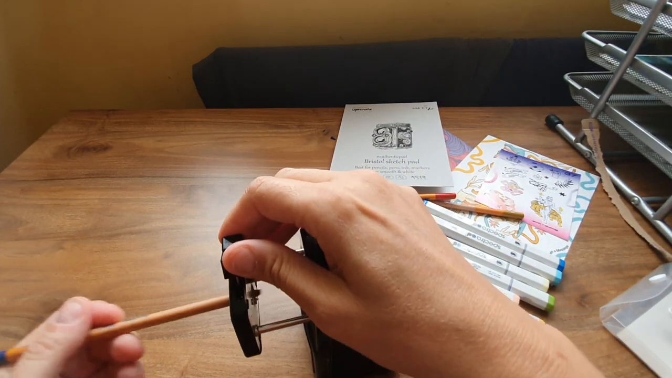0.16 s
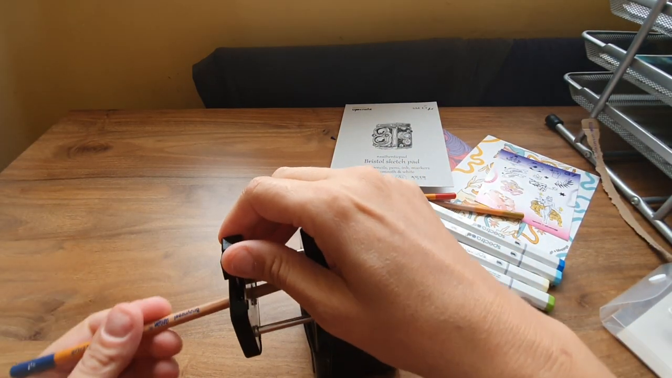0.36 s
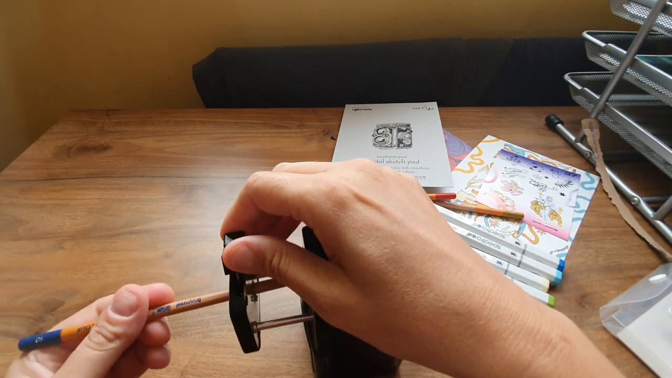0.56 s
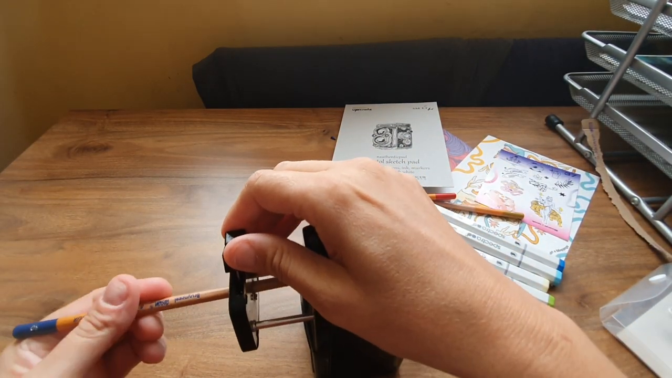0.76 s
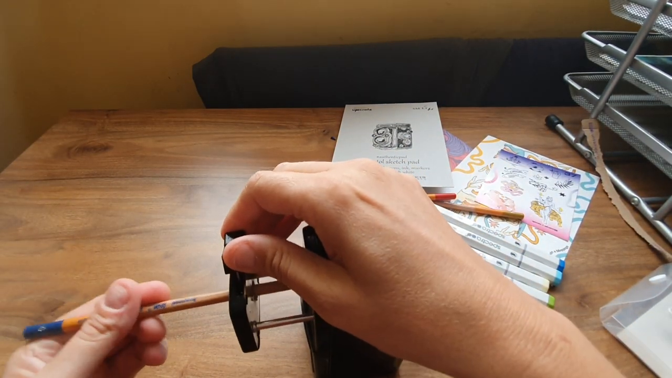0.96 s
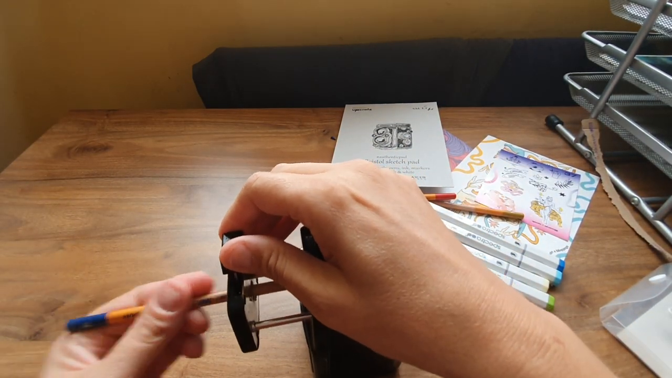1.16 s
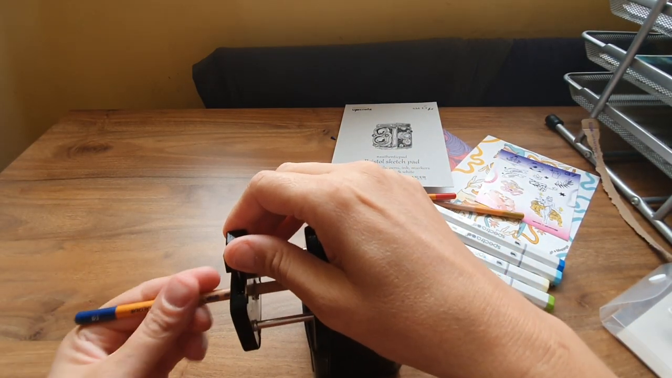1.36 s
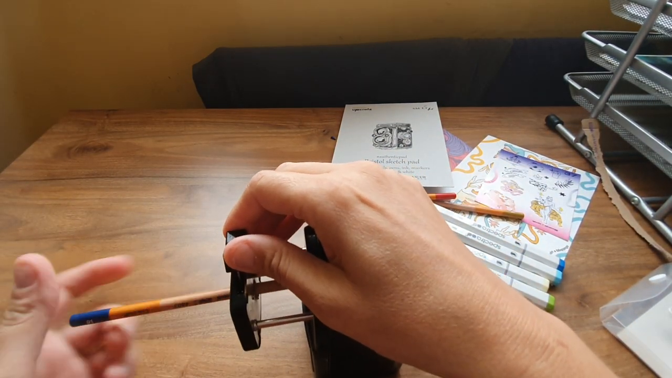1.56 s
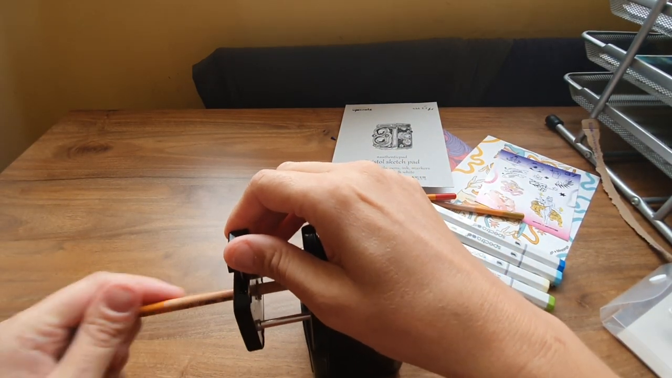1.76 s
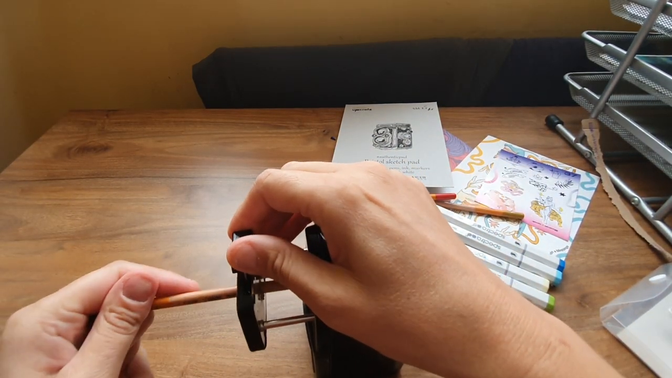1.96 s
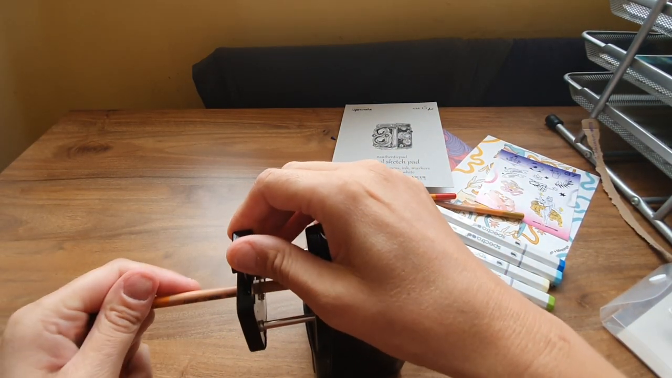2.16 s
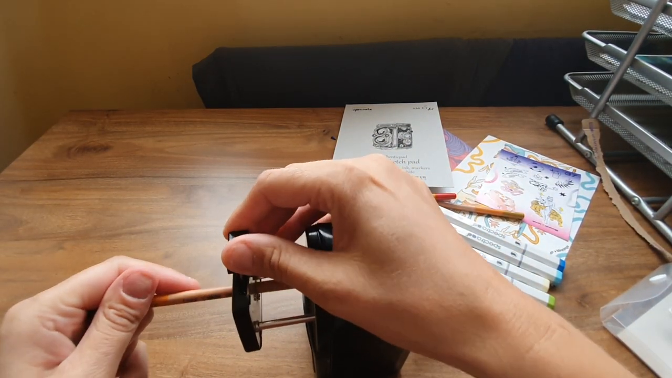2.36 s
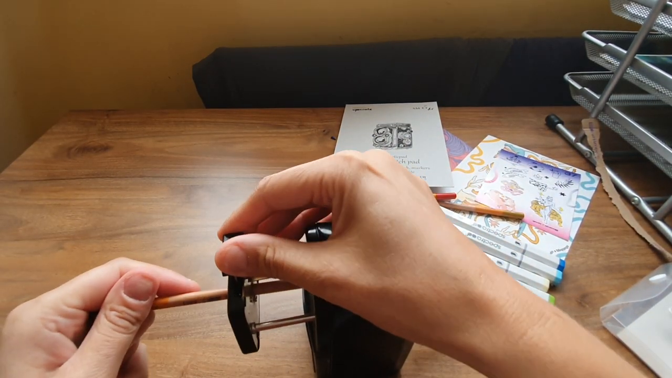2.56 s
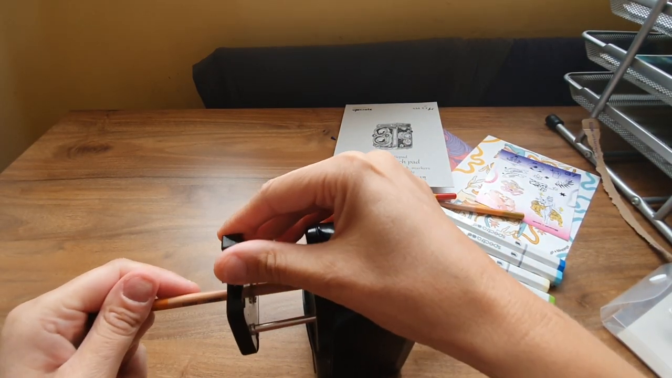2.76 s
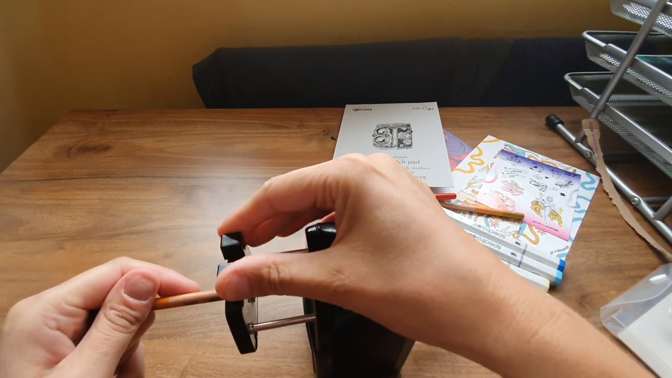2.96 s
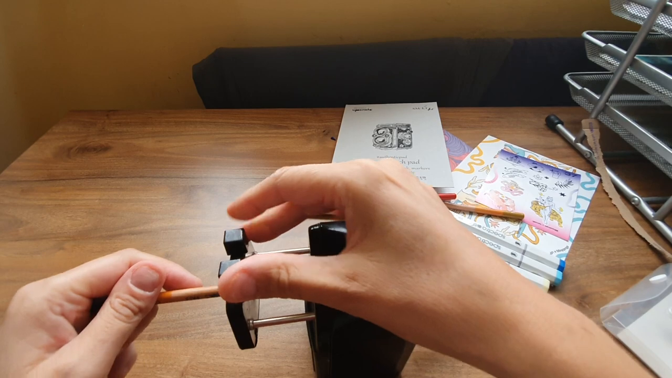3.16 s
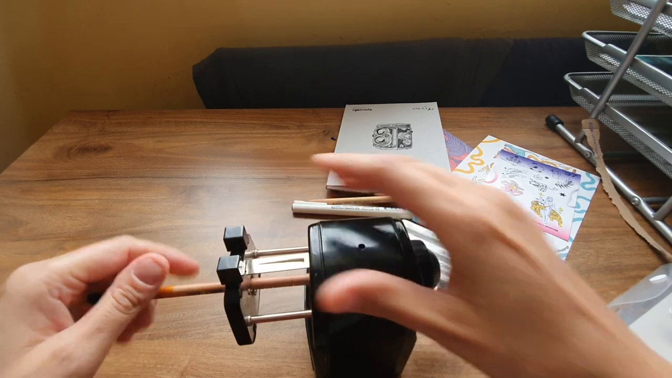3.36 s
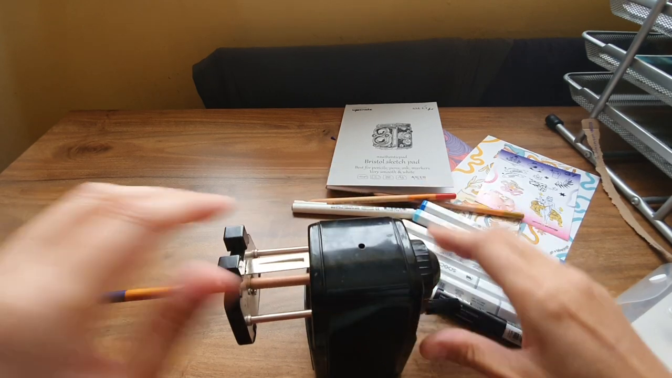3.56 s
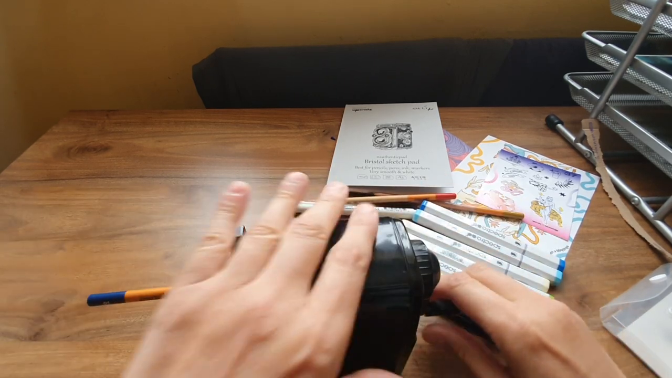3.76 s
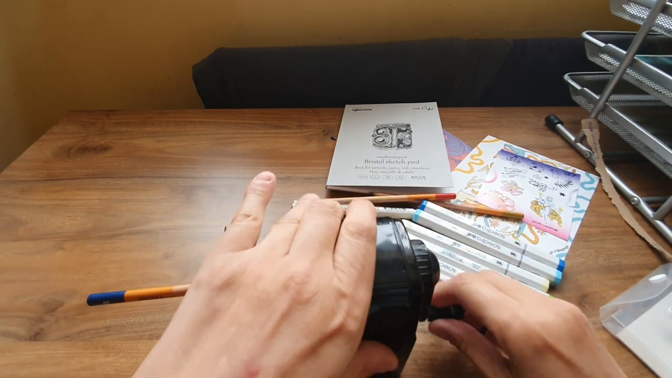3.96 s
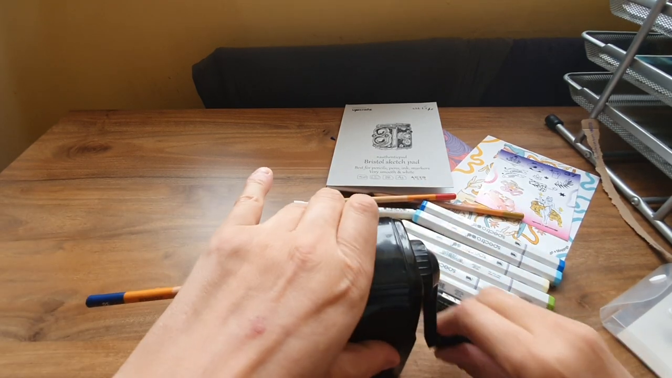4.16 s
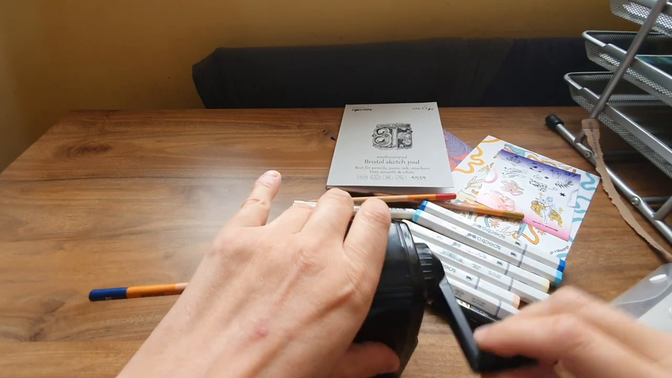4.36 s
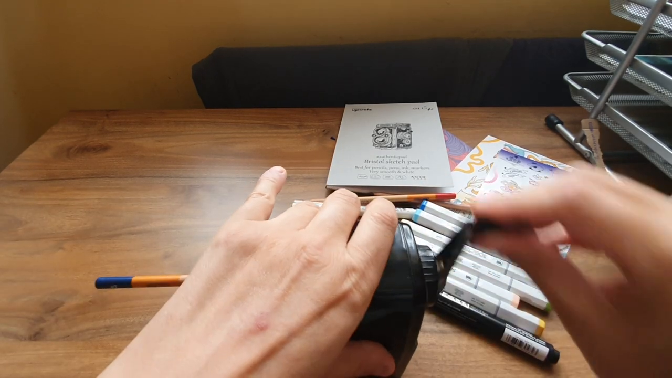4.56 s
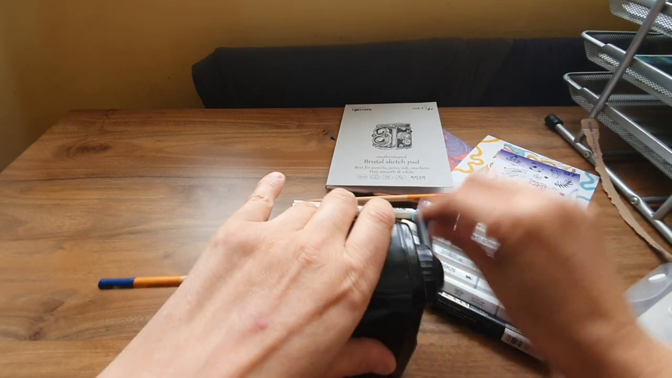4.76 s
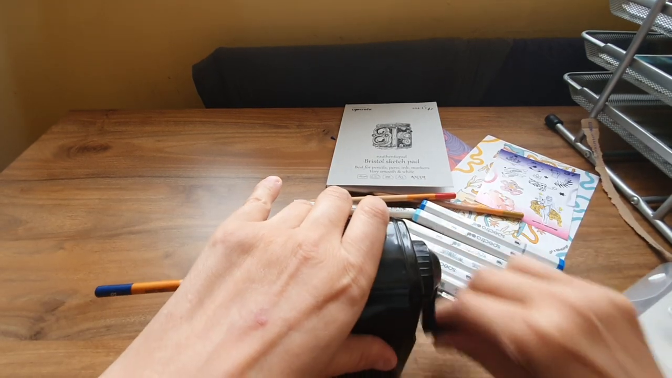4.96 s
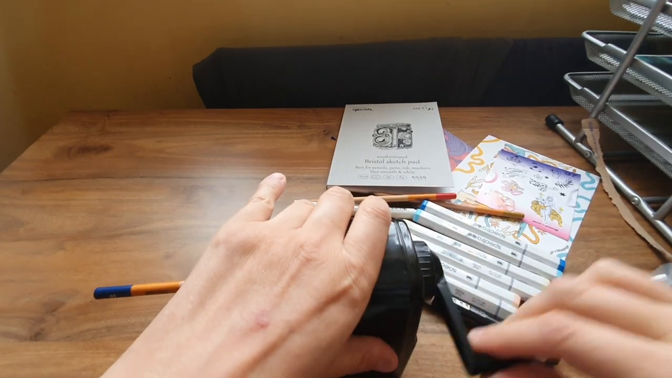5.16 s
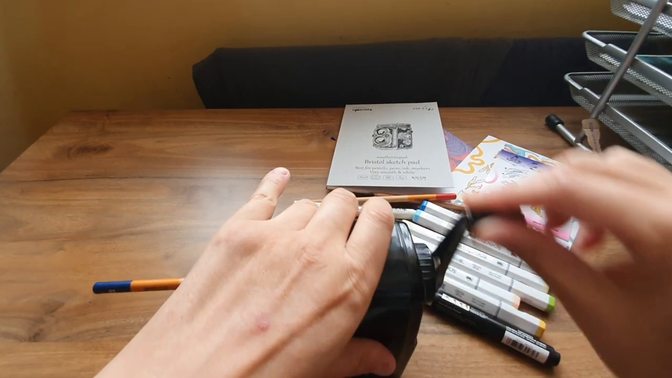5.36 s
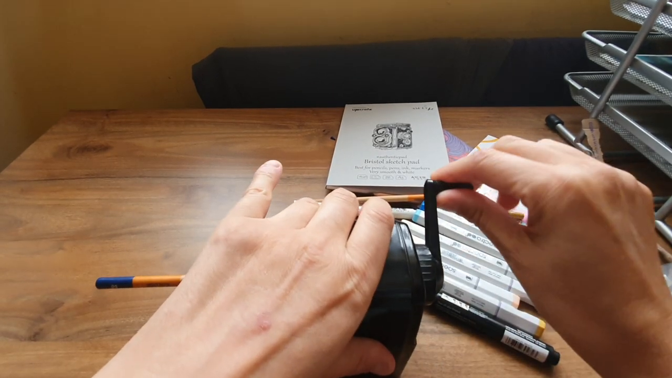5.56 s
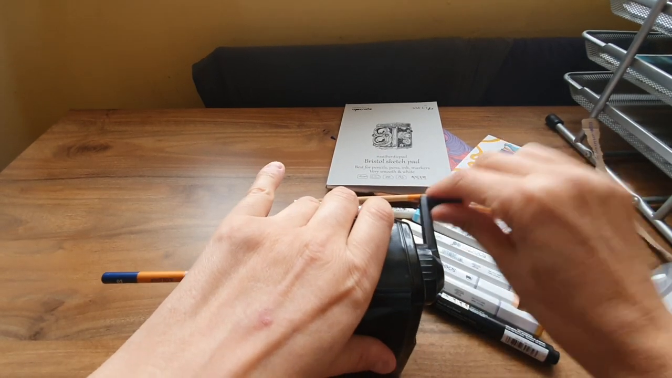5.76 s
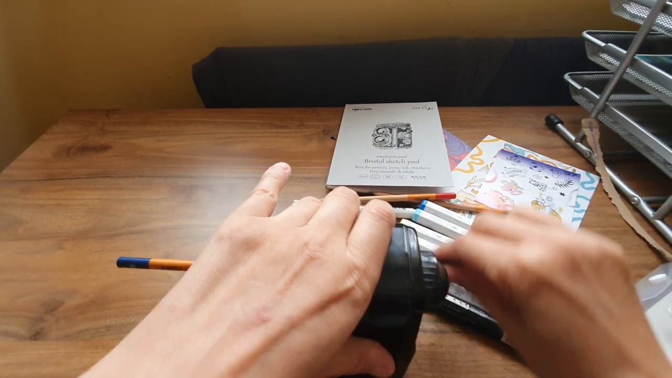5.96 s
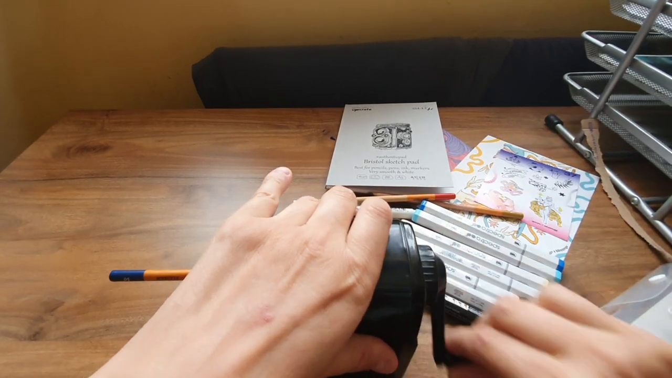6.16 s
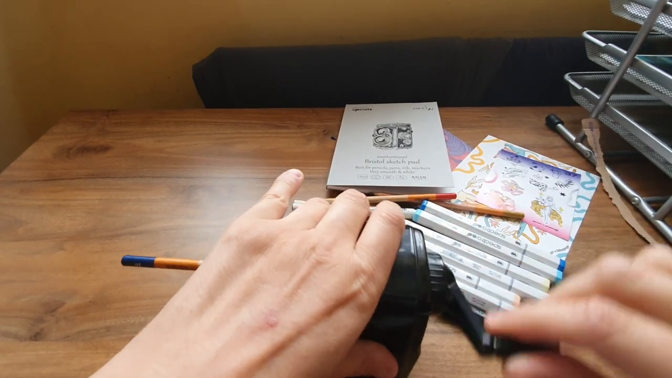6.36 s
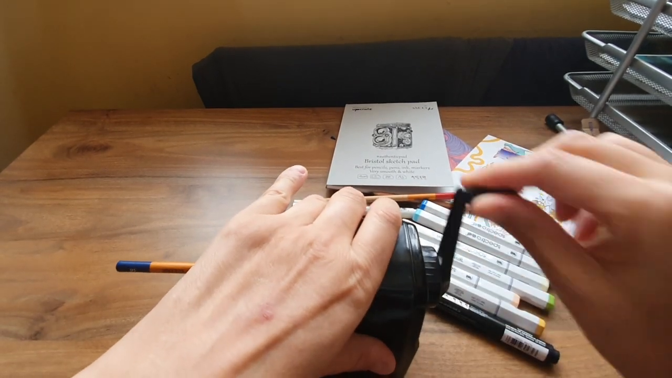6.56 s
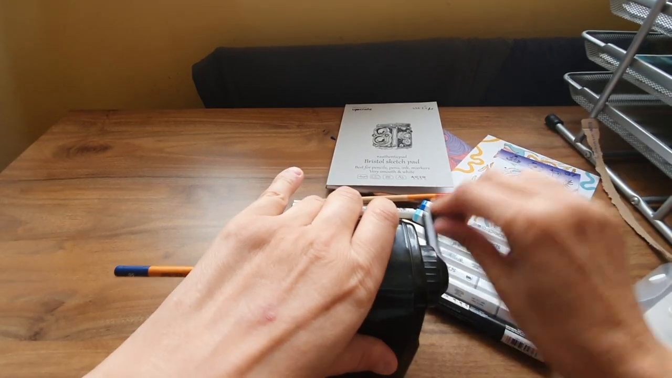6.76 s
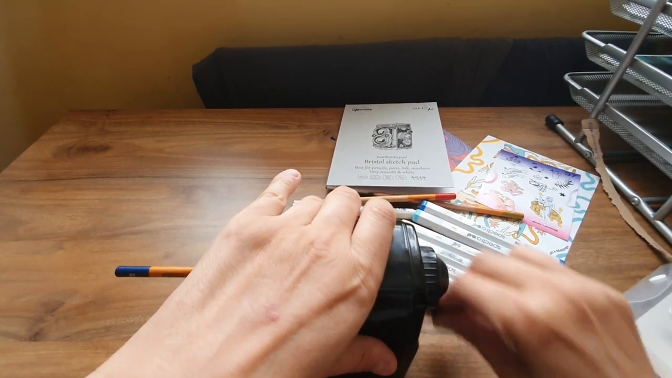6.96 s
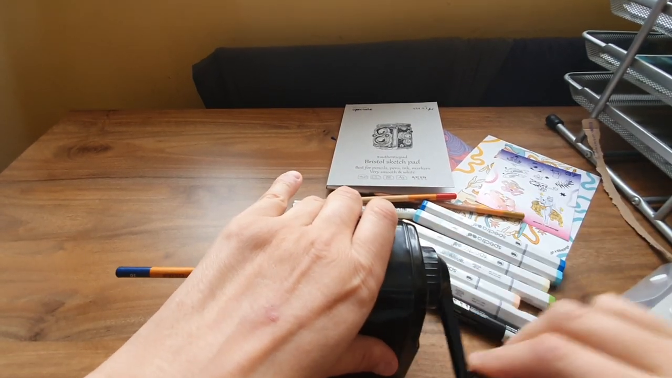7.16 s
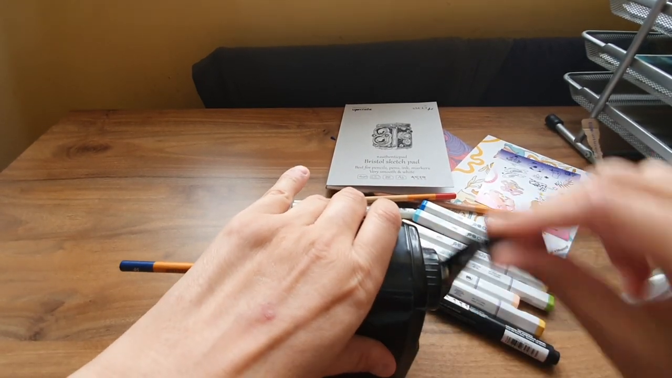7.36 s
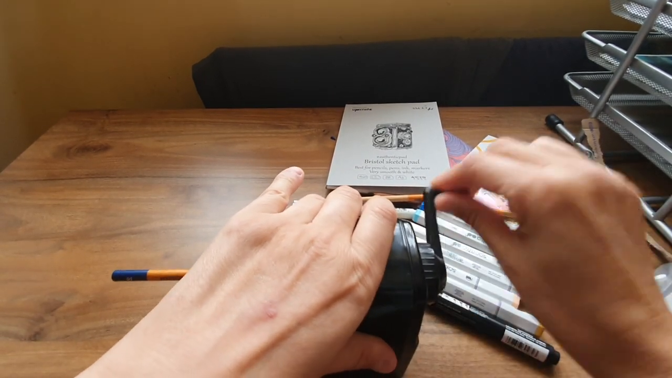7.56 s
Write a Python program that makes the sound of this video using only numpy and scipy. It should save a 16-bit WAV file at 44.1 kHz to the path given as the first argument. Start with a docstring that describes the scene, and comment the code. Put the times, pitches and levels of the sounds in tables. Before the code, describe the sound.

A pencil clicks and scrapes into a hand-crank sharpener, sharp clamp snaps follow, then uneven woody grinding starts on a wooden desk indoors.

```python
"""Small furnished room, wooden desk, close pair of microphones: a pencil enters a hand-crank sharpener.
Fine grains ring the pencil in the clamp; noise bursts through resonances make taps and clamp snaps.
Then the crank turns: dense uneven chip grains, paced by the flutes, shake plastic housing and desk and hiss.
A steel spring, a set of high decaying modes, rings when jolted. Room tone lies under it all."""
import sys
import numpy as np
from scipy import signal
from scipy.fft import rfft, irfft, next_fast_len
from scipy.io import wavfile

SR = 44100
rng = np.random.default_rng(int(sys.argv[2]) if len(sys.argv) > 2 else 0)


def unload_wav(signal):
    """Save mono or channel-first audio to the path in sys.argv[1] as 16-bit WAV at rate SR, clipped to [-1, 1]."""
    wavfile.write(
        sys.argv[1],
        SR,
        np.round(np.clip(np.atleast_2d(signal).T, -1, 1) * 32767).astype(np.int16),
    )


N = 335160
FFT_SIZE, PAD = 2 ** 15, next_fast_len(N + 8192)   # samples

# Levels in tables are relative drives unless a reference is given.
# room tone spectrum: f/Hz, density/dB
ROOM_TONE_SPECTRUM = [(12, -47.5), (20, -2), (63, 3), (107, -11), (210, -11), (410, -25.5), (825, -28),
                      (1440, -33), (2260, -31.5), (4670, -36), (7520, -41), (13200, -41), (16000, -48.5)]
# walls: f/Hz, level re direct/dB
WALL_GAIN = [(60, -19.5), (250, -12), (600, -3.5), (2000, -7), (6000, -2.5), (14000, -9)]
# near reflections: f/Hz, level re direct/dB
NEAR_GAIN = [(200, -30), (1000, -14), (3000, -11), (15000, -18)]
# balance of the pair: f/Hz, left minus right/dB
LEFT_MINUS_RIGHT = [(60, 5), (130, 0.5), (290, 0.5), (640, 1.5), (1410, 7), (3100, 3.5), (6820, 5.5),
                    (15000, 2.5)]
# desk resonances: f/Hz, width/Hz, level/dB
DESK_MODES = [(118.7, 14, 4.5), (163.4, 15.4, 6.5), (259.6, 24, 4), (357.2, 27, -1.5), (433, 34.4, -9.5)]
# smooth desk response: f/Hz, density/dB
DESK_BED_SPECTRUM = [(25, -12.5), (70, -9), (200, -9), (430, -15), (520, -31), (900, -73.5)]
# housing panel resonances: f/Hz, width/Hz, level/dB
HOUSING_MODES = [(687, 49, -4), (752, 14, -5.5), (833, 28, -5), (949, 41, -6.5), (1191, 58, -3.5),
                 (1281, 61, -7.5), (1423, 77, -4.5), (1575, 75, -1.5), (1660, 68, -9.5), (1928, 210, -3),
                 (2238, 69, -3.5), (2516, 86, 0), (2828, 160, -10), (3112, 92, -4), (3473, 530, -7)]
# smooth housing response: f/Hz, density/dB
HOUSING_BED_SPECTRUM = [(300, -40.5), (520, -20), (640, -8), (1500, -20.5), (2700, -12), (3600, -31.5),
                        (6000, -39.5)]
# pencil shaft resonances: f/Hz, width/Hz, level/dB
PENCIL_MODES = [(700, 200, -14), (1540, 150, -3), (1750, 180, -2), (2200, 300, -11), (2650, 340, 2),
                (3780, 300, -4), (4830, 280, -4), (5720, 280, -12), (7040, 300, -23), (9140, 500, -24),
                (10200, 600, -25), (12100, 400, -27)]
# smooth pencil response: f/Hz, density/dB
PENCIL_BED_SPECTRUM = [(300, -65), (1000, -14), (3000, -4.5), (6000, -20), (8000, -22.5), (16000, -30)]
# skin on plastic: f/Hz, density/dB
SKIN_SPECTRUM = [(300, -31), (750, 2.5), (1100, -9), (1800, 12), (2500, 4), (4800, -9), (7000, -10.5),
                 (11000, -18), (15000, -25)]
# crack of a contact: f/Hz, density/dB
CRACK_SPECTRUM = [(2200, -29), (3500, 9), (5500, 0.5), (7500, -2.5), (9100, 1), (11500, -6.5), (14000, -2),
                  (16000, -23.5)]
# shaving hiss: f/Hz, density/dB
HISS_SPECTRUM = [(2200, -19), (3500, 6.5), (4500, 3.5), (5500, 2.5), (7500, -7), (9100, 0.5), (10600, -8.5),
                 (12500, -4), (14000, -6.5), (15500, -3.5), (16500, -41)]
# edges of the hiss bands that flicker separately: f/Hz
HISS_EDGES_HZ = [2000, 3800, 5000, 6300, 7600, 9000, 10500, 12200, 14000, 18000]
# steel spring modes: f/Hz, level/dB, t60/s
SPRING_MODES = [(11400, -3, .09), (11480, -6, .07), (11250, -8, .03), (14030, -12, .05), (9330, -18, .05)]

# dull low thumps of the desk, from hands and from the first cutter catches: t/s, level/dB
DESK_THUMPS = [(0.389, -53.5), (0.552, -42), (0.61, -59), (1.559, -47), (1.618, -42), (1.947, -47),
               (2.503, -49.5), (3.35, -53.5), (4.351, -25), (4.383, -31.5)]
# lacquer squeak in the clamp: t/s, f/Hz, level/dB
SQUEAK_GLIDE = [(.33, 1520, -56), (.338, 1707, -40), (.35, 1790, -37), (.365, 1714, -54), (.385, 1490, -60)]
# fingertip on the hollow shavings drawer: touch t/s, lift t/s, attack/s, touch level/dB, lift level/dB
DRAWER_RUBS = [(2.922, 2.934, .004, -73, -67), (3.192, 3.31, 0.0054, -68, -78),
               (3.372, 3.405, .01, -72.5, -80), (3.797, 3.809, .003, -58, -55)]
# fingers shifting on the housing: touch t/s, lift t/s, attack/s, touch level/dB, lift level/dB
FINGER_STROKES = [(2.376, 2.528, 0.036, -63, -59.5), (2.8, 2.93, 0.0085, -70.5, -72),
                  (3.1, 3.18, 0.0096, -69, -76.5), (3.188, 3.4, 0.012, -70.5, -92.5),
                  (3.584, 3.65, 0.013, -79.5, -99), (3.97, 4.16, 0.033, -74.5, -88)]
# pencil sliding in the clamp, and ringing on after taps:
# start t/s, end t/s, attack/s, start level/dB, end level/dB
PENCIL_STROKES = [(0.014, 0.1, 0.005, -58.5, -121), (0.15, 0.33, 0.008, -53.5, -46),
                  (0.34, 0.464, 0.014, -44.5, -56), (0.879, 0.97, 0.002, -43.5, -71),
                  (0.982, 1.22, 0.022, -59, -36.5), (1.226, 1.27, .004, -34, -31),
                  (1.486, 1.554, 0.036, -49.5, -91), (1.59, 1.72, 0.004, -42.5, -78)]
# pencil and fingers tap clamp and housing:
# t/s, level/dB, ring f/Hz, crack/dB, desk thump/dB, contact/s, pan/dB; crack and thump ride on level
TAP_ROWS = [(0.198, -50, 980, -30, -15.5, 0.038, -3), (0.476, -25.5, 2630, -7, -17.5, 0.0059, 11.5),
            (0.498, -37, 1510, -27, -12, 0.014, -13), (0.544, -36.5, 750, -14, -9, 0.0072, -2),
            (0.878, -25, 1840, -2, -18.5, 0.0022, 15.5), (0.88, -30, 5300, -32, -40, 0.0017, -8),
            (0.897, -34.5, 1810, -29, -4.5, 0.017, -3), (1.223, -25, 1550, -21, -11, 0.0062, 12),
            (1.268, -26.5, 800, -40, -25.5, .012, -2.5), (1.264, -20, 1850, -7.5, -40, 0.0065, -9),
            (1.271, -17.5, 1620, -31, -10, 0.0042, 16), (1.473, -61, 4450, -29, -9, 0.012, 16),
            (1.56, -47, 1590, -28, -18, 0.0077, 0), (1.586, -31, 1640, -8, -27, 0.0056, 5.5),
            (2.078, -57, 1607, -24, -8.5, 0.013, 5.5), (2.619, -36.5, 760, -2, -13.5, 0.0041, 6),
            (2.947, -47, 1150, -20, -2, 0.016, -7), (3.188, -57, 720, -3, -8, 0.012, 12.5),
            (0.468, -45, 1000, -24, -5, .004, -4), (3.806, -46, 2810, -18, -14.5, 0.0071, 11),
            (3.819, -32, 1770, -21, -12, 0.028, -10), (4.087, -64, 3050, -11.5, -8, 0.0073, 5),
            (4.102, -59.5, 3100, -29, -32, .008, 6.5), (4.118, -56.5, 1220, -10, -7.5, .012, 10.5)]
# steel clamp and crank snap, tick and chatter:
# t/s, level/dB, ring f/Hz, crack/dB, bright tick/dB, desk thump/dB; the last three ride on level
SNAP_ROWS = [(0.846, -52.5, 1760, -1, 7.5, -16), (1.761, -47.5, 1380, -2, -27, 7),
             (1.769, -24.5, 1950, -5, -14, -19.5), (1.777, -22, 1810, 2, -11, -36),
             (1.783, -16.5, 2490, -29, -3, -14), (1.798, -19.5, 2700, -3, -7, -12.5),
             (1.847, -11, 1810, -2, -11, -23.5), (1.89, -37.5, 2213, -16.5, -15, -5),
             (2.5349, -23, 1670, -10.5, 5, -14.5), (2.549, -25.5, 2900, -16, -5, -33),
             (2.562, -41.5, 2240, 3, 14, -1), (2.8, -56, 4600, 1.5, -1, -22.5),
             (2.838, -56, 4600, -14, -2, -29), (2.938, -31, 1990, -34, -32, -13.5),
             (3.039, -64, 5460, 2, -4, -19), (3.05, -57, 1930, -5, 3, -15),
             (3.061, -37.5, 1900, -12, -0.5, -7.5), (3.104, -51.5, 1700, -7, -4, -3),
             (3.278, -58.5, 4760, -9, -10, -12), (3.582, -59.5, 3020, -10, -10, -17),
             (3.812, -22, 1440, -26, -10, -14.5), (3.8115, -23.5, 2740, -26, -25, -27)]
# jolts of the spring: t/s, level/dB
SPRING_JOLTS = [(1.777, -20), (1.8182, -38), (1.974, -56), (2.537, -36), (2.552, -27), (2.569, -40),
                (3.061, -64), (4.461, -31.5), (4.595, -30), (4.627, -33), (4.6828, -44), (5.279, -33.5),
                (5.3732, -37), (5.42, -46), (6.4336, -40), (7.3487, -39), (7.4497, -38)]
# cutter catches on the wood: t/s, level/dB, ring f/Hz, crack/dB; crack rides on level
CATCH_ROWS = [(4.177, -33.5, 660, -3.5), (4.232, -44, 816, -27), (4.243, -47, 3100, 4),
              (4.359, -21, 3070, -2.5), (4.391, -15.5, 1480, -16), (4.421, -23.5, 1590, -18),
              (4.464, -20.5, 1640, -24), (4.59, -17, 1440, -6), (4.845, -13, 895, -7.5),
              (5.277, -22, 1510, -2), (5.418, -13, 1600, -7.5), (5.613, -26.5, 1180, -31),
              (5.79, -42.5, 1500, -15), (6.07, -18, 910, -6.5), (6.187, -28, 1210, -23),
              (6.343, -38, 2500, 10), (6.543, -12, 1660, -11), (6.773, -18.5, 1960, -20),
              (6.838, -21, 1460, -23), (7.476, -33, 2500, 2)]
# cutting effort, one list per spell of cranking: t/s, housing level/dB, desk rumble re housing/dB
EFFORT_SPELLS = [
    [(4.15, -72, 6), (4.176, -44.5, 3.5), (4.302, -41.5, -3), (4.382, -28.5, -9), (4.432, -34.5, -7),
     (4.512, -38, -5), (4.57, -35, -8), (4.584, -31.5, -4), (4.79, -34, -0.5), (4.8, -27.5, -8.5),
     (4.884, -23.5, -5), (4.924, -39, 3.5), (5.024, -28.5, -9), (5.078, -33.5, 0.5), (5.29, -30, -7),
     (5.36, -32, -4), (5.458, -28.5, -10.5), (5.616, -40, 4), (5.76, -127, 34)],
    [(5.76, -84, 15), (5.79, -45.5, -1), (5.842, -34, -1.5), (5.938, -50.5, -4), (6.0, -30.5, -3.5),
     (6.286, -31.5, -10.5), (6.322, -28.5, 6.5), (6.364, -26, -7), (6.502, -36.5, -5.5), (6.548, -30, -6.5),
     (6.626, -35, -3.5), (6.81, -31, -0.5), (6.948, -35, -6), (7.04, -29, -14), (7.142, -31.5, -2.5),
     (7.27, -28.5, -1.5), (7.38, -33, -7), (7.538, -30.5, -1), (7.6, -32.5, -10)],
]
# shaving hiss, one list per spell: t/s, level/dB
HISS_SPELLS = [
    [(4.15, -84), (4.18, -64), (4.22, -68), (4.378, -51), (4.562, -53.5), (4.606, -41.5), (4.736, -50),
     (4.884, -43), (4.924, -53.5), (5.154, -54.5), (5.432, -43), (5.628, -58.5), (5.76, -125)],
    [(5.76, -93), (5.8, -56), (5.836, -56), (5.948, -67), (6.03, -43.5), (6.236, -59), (6.39, -46),
     (6.738, -52.5), (6.794, -45.5), (6.942, -57.5), (6.978, -52.5), (7.516, -46), (7.6, -51)],
]
# one panel is pressed and sings out: centre t/s, length/s, panel f/Hz, boost/dB
PANEL_SINGS = [(4.288, 0.095, 830, 15), (4.407, 0.38, 1585, 8), (4.532, 0.12, 830, 10.5),
               (4.576, 0.066, 1585, 8.5), (4.687, 0.2, 1190, 10.5), (4.733, 0.16, 2520, 8.5),
               (5.053, 0.092, 2520, 7.5), (5.067, 0.1, 1585, 6.5), (5.21, 0.32, 762, 6.5),
               (5.29, 0.14, 1585, 1.5), (5.455, 0.079, 1190, 9), (5.497, 0.14, 690, -1),
               (6.2, 0.12, 2520, 7.5), (6.373, 0.046, 1450, 15), (6.544, 0.11, 1710, 14),
               (6.63, 0.7, 1190, 6.5), (6.992, 0.056, 1585, 9), (7.266, 0.064, 1295, 12.5),
               (7.26, 0.084, 830, 12), (7.422, 0.3, 1585, 4), (7.452, 0.16, 1190, 11)]

ROOM_TONE_DB = -69
ROOM_T60_S, NEAR_T60_S = 0.25, 0.0046
HANDS_LEAD_S, CRANK_LEAD_S = 0.00018, 0.00002   # left microphone hears first
APART_SHARE = 0.54   # power share of crack and hiss that differs between microphones
LIFT_S, EDGE_DB = 0.006, -23.5   # stroke fade-out; start and end re its level
FLEX_S, FLEX_RATE_HZ = 0.00035, 3.0   # panel flex: mean delay at 1500 Hz, pace of its wander
DRAWER_HZ, DRAWER_WIDTH_HZ = 745, 150

RISE_S, BLOW_DELAY_S = 0.00067, 0.0015   # contact build-up; hard contact after first touch
BLOW = np.hanning(8) / 3.5   # hard contact, unit sum, a fifth of a millisecond
SPLIT_HZ = 7200   # crack below, bright tick above
TAP_TICK_DB, TAP_WIDTH, TAP_BLOW_DB = -36, 0.2, 12   # tick column re crack column; ring width / pitch
SNAP_CONTACT_S, SNAP_PAN_DB, SNAP_WIDTH, SNAP_BLOW_DB = 0.0061, 5, 0.075, 13
CATCH_TICK_DB, CATCH_THUMP_DB = -5, -12.5   # tick column re crack column; thump column
CATCH_CONTACT_S, CATCH_PAN_DB, CATCH_WIDTH, CATCH_BLOW_DB = 0.0023, -2, 0.14, 11.5
SPRING_PAN_DB = -1.5   # left minus right

CHIPS_PER_S, FLUTES_PER_S = 5000, 88   # flute pace wavers about this
SPLINTERS_PER_S, SPLINTERS_DB = 200, -5   # larger splinters, level re chips
LOW_PANELS_DB, MID_PANELS_DB, HIGH_PANELS_DB, BED_DB = -7.5, -10, -15, -6   # re housing level
LOW_FOLLOWS, HIGH_FOLLOWS, PIVOT_DB = 0.58, 0.85, -38   # exponents on effort, pivot level
CUTOFF_HZ = 16000


def amp(db):
    """Decibels to amplitude."""
    return 10 ** (np.asarray(db) / 20)


def rms_one(x):
    """Scale to rms 1."""
    return x / np.sqrt(np.mean(x ** 2) + 1e-20)


def in_time(rows):
    """Table columns over time; -150 dB outside the table."""
    t, *columns = np.transpose(rows)
    return [np.interp(np.arange(N) / SR, t, c, left=-150, right=-150) for c in columns]


def gain_at(hz, points):
    """Gain curve, straight in dB over log frequency."""
    points_hz, points_db = np.transpose(points)
    return amp(np.interp(np.log(hz + 1), np.log(points_hz), points_db))


def tilt(x, points):
    """Gain over frequency for smooth curves."""
    hz = np.arange(PAD // 2 + 1) * SR / PAD
    return irfft(rfft(x, PAD) * gain_at(hz, points), PAD)[..., :N]


def body(bed, peaks=()):
    """Minimum-phase response of a smooth bed plus resonances; unit energy."""
    hz = np.arange(FFT_SIZE // 2 + 1) * SR / FFT_SIZE
    power = gain_at(hz, bed) ** 2
    for centre_hz, width_hz, level_db in peaks:
        power = power + amp(level_db) ** 2 / (1 + ((hz - centre_hz) / width_hz) ** 2) ** 2
    # fold the cepstrum to make the response causal
    cepstrum = irfft(np.log(power) / 2)
    cepstrum[1:FFT_SIZE // 2] *= 2
    cepstrum[FFT_SIZE // 2 + 1:] = 0
    response = irfft(np.exp(rfft(cepstrum)))[:FFT_SIZE // 4]
    return response / np.linalg.norm(response)


def through(x, response):
    """Convolve every channel with a response."""
    return signal.oaconvolve(x, response * np.ones(x.shape[:-1] + (1,)), axes=-1)[..., :N]


def resonate(x, hz, width_hz):
    """Two-pole resonance; white noise keeps its rms."""
    r = np.exp(-np.pi * width_hz / SR)
    zeros = np.sqrt((1 - r * r) / 2) * np.array([1, 0, -1])
    return signal.lfilter(zeros, [1, -2 * r * np.cos(2 * np.pi * hz / SR), r * r], x)


def resonate_twice(x, hz, width_hz):
    """Two equal resonances in series, level restored."""
    once = resonate(x, hz, width_hz)
    return resonate(once, hz, width_hz) * np.sqrt(2 * np.pi * width_hz / SR)


def coarse_drift(rate_hz):
    """Slow chance with rms 1, drawn at every 32nd sample."""
    r = np.exp(-64 * np.pi * rate_hz / SR)
    noise = rng.standard_normal(N // 32 + 2002)
    return rms_one(signal.lfilter([1], [1, -2 * r, r * r], noise)[2000:])


def drift(rate_hz, n=np.arange(N), shape=lambda x: x):
    """Slow chance, shaped, read at samples n."""
    slow = shape(coarse_drift(rate_hz))
    return np.interp(n / 32, np.arange(len(slow)), slow)


def grains(per_s, spread_db):
    """Random clicks of uneven size and sign; rms 1."""
    sizes = amp(spread_db * np.minimum(rng.exponential(1, N), 5)) * rng.choice([-1, 1], N)
    return rms_one(sizes * (rng.random(N) < per_s / SR))


def strokes(rows):
    """Each stroke sets in, glides evenly in dB from touch to lift, and stops."""
    out = np.zeros(N)
    for touch_s, lift_s, attack_s, touch_db, lift_db in rows:
        start_s, end_s = touch_s - attack_s, lift_s + LIFT_S
        n = np.arange(max(0, round(start_s * SR)), round(end_s * SR))
        level_db = np.interp(n / SR, [start_s, touch_s, lift_s, end_s],
                             [touch_db + EDGE_DB, touch_db, lift_db, lift_db + EDGE_DB])
        out[n] += amp(level_db)
    return out


def apart(common, own):
    """Sound from many small spots: each microphone hears partly other grains."""
    return np.sqrt(1 - APART_SHARE) * common + np.sqrt(APART_SHARE) * own * [[1], [-1]]


def placed(x, lead_s):
    """The right microphone hears the same sound a little later."""
    left, right = x * np.ones((2, 1))
    hz = np.arange(PAD // 2 + 1) * SR / PAD
    late = irfft(rfft(right, PAD) * np.exp(-2j * np.pi * hz * lead_s), PAD)[:N]
    return np.stack([left, late])


def panels(force, modes, wander_db, rate_hz, span_s, twice=False):
    """Parallel resonances; the contact point moves, so each swells and wavers in pitch on its own."""
    out, n = np.zeros(N), np.arange(N)[round(span_s[0] * SR):round(span_s[1] * SR)]
    ring_up = resonate_twice if twice else resonate
    for k, (hz, width_hz, level_db) in enumerate(modes):
        swell = drift(rate_hz, n, lambda x: amp(level_db + wander_db * x))
        ring = ring_up(swell * force(hz)[n] + 1e-18, hz, width_hz)
        delay = FLEX_S * SR * (1 + drift(FLEX_RATE_HZ, n)) * 1500 / hz
        out[n] += (-1) ** k * np.interp(n - delay, n, ring)
    return out


def room_tone():
    """Wavering low rumble common to both microphones over a faint hiss, part of it different in each."""
    mid, side = through(rng.standard_normal((2, N)), body(ROOM_TONE_SPECTRUM))
    rumble = tilt(mid, [(200, 0), (500, -40)])
    side = tilt(side, [(100, -6.5), (1000, -1.5)])
    return amp(ROOM_TONE_DB) * (mid + side * [[1], [-1]] + amp(4.5 * drift(3) - 3.5) * rumble)


def echoes(x, start_s, t60_s, points):
    """Dense dying noise tail, another one for each microphone."""
    t = np.arange(SR // 2) / SR
    tail = rng.standard_normal((2, len(t))) * amp(-60 * t / t60_s) * (t > start_s)
    tail /= np.linalg.norm(tail, axis=1, keepdims=True)
    return tilt(through(x, tail), points)


def room(x):
    """Desk, hands and papers reflect at once; the walls follow."""
    return echoes(x, 0.00042, NEAR_T60_S, NEAR_GAIN) + echoes(x, 0.0038, ROOM_T60_S, WALL_GAIN)


def desk_thumps():
    """Dull low thumps: dying noise bursts that only the desk answers."""
    t, force = np.arange(SR // 10) / SR, np.zeros(N + SR // 10)
    for (s, level_db), noise in zip(DESK_THUMPS, rng.standard_normal((len(DESK_THUMPS), len(t)))):
        force[round(s * SR):][:len(t)] += amp(level_db) * noise * np.exp(-t / 0.029)
    dull = signal.butter(2, 250, fs=SR, output="sos")
    return signal.sosfilt(dull, through(force[:N], body(DESK_BED_SPECTRUM, DESK_MODES)))


def rubs():
    """Friction noise rings the drawer's one hollow note."""
    friction = strokes(DRAWER_RUBS) * rng.standard_normal(N) + 1e-18
    return resonate_twice(friction, DRAWER_HZ, DRAWER_WIDTH_HZ)


def squeak():
    """Brief stick-slip tone, roughened in level."""
    hz, level_db = in_time(SQUEAK_GLIDE)
    return amp(level_db + 5.5 * drift(150)) * np.sin(2 * np.pi * np.cumsum(hz) / SR)


def pencil_and_skin():
    """Fine grains ring the pencil, sliding or after taps; skin on plastic rustles broadly."""
    grit = amp(1.5 * drift(30)) * grains(4000, spread_db=2.5)
    pencil, skin = strokes(PENCIL_STROKES) * grit, strokes(FINGER_STROKES) * grit
    rings = panels(lambda hz: amp(-10) * pencil, PENCIL_MODES,
                   wander_db=2.0, rate_hz=14, span_s=(0, 2), twice=True)
    scrape = through(amp(-10.5) * pencil, body(PENCIL_BED_SPECTRUM))
    return rings + scrape + through(amp(3.5) * skin, body(SKIN_SPECTRUM))


def knocks(blows):
    """A hard contact and a short dying rattle sound the struck part, housing, crack and desk."""
    t = np.arange(SR // 10) / SR
    rattle = rng.standard_normal((len(blows), 2, len(t)))
    below, above = (signal.butter(4, SPLIT_HZ, kind, fs=SR, output="sos") for kind in ("low", "high"))
    force = np.zeros((4, 2, N + len(t)))
    for row, noise in zip(blows, rattle):
        s, level_db, hz, crack_db, tick_db, thump_db, contact_s, pan_db, width, blow_db = row
        decay = np.exp(-t / np.clip(contact_s, 0.0005, 0.03))
        burst, own = amp(level_db - 3.0) * noise * (1 - np.exp(-t / RISE_S)) * decay
        fine = apart(burst, own)   # taken before the hard contact is added
        place = amp([[pan_db / 4], [-pan_db / 4]])   # left minus right: half the pan column
        burst[round(BLOW_DELAY_S * SR):][:len(BLOW)] += amp(level_db + blow_db) * BLOW
        struck = amp(-2) * resonate(burst, hz, width * hz)
        crack = amp(crack_db + 2.0) * signal.sosfilt(below, fine)
        crack += amp(tick_db + 3.0) * signal.sosfilt(above, fine)
        parts = place * struck, place * amp(-4.0) * burst, place * crack, amp(thump_db + 5.0) * burst
        at = round(s * SR)
        for layer, part in zip(force, parts):
            layer[:, at:at + len(t)] += part
    bodies = (body(HOUSING_BED_SPECTRUM, HOUSING_MODES), body(CRACK_SPECTRUM),
              body(DESK_BED_SPECTRUM, DESK_MODES))
    return force[0, :, :N] + sum(through(f[:, :N], b) for f, b in zip(force[1:], bodies))


def handling():
    """Taps and snaps of pencil, fingers, clamp and crank, as rows for knocks()."""
    taps = [(*row[:4], row[3] + TAP_TICK_DB, *row[4:], TAP_WIDTH, TAP_BLOW_DB) for row in TAP_ROWS]
    snaps = [(*row, SNAP_CONTACT_S, SNAP_PAN_DB, SNAP_WIDTH, SNAP_BLOW_DB) for row in SNAP_ROWS]
    return taps + snaps


def spring():
    """Each jolt is a brief chatter that drives every steel mode with a strength of its own."""
    at, jolt_db = [round(s * SR) for s, db in SPRING_JOLTS], np.array(SPRING_JOLTS)[:, 1]
    scatter_db = rng.normal(0, 1.0, (len(at), len(SPRING_MODES)))
    chatter = np.exp(-np.arange(SR // 10) / SR / 0.02)
    chatter /= np.linalg.norm(chatter)
    out = np.zeros(N)
    for (hz, level_db, t60_s), own_db in zip(SPRING_MODES, scatter_db.T):
        clicks = np.zeros(N)
        clicks[at] = amp(jolt_db + level_db + own_db)
        force = through(clicks, chatter) * rng.standard_normal(N)
        r, w = amp(-60 / (t60_s * SR)), 2 * np.pi * hz / SR
        out += signal.lfilter([0, np.sin(w)], [1, -2 * r * np.cos(w), r * r], force + 1e-18)
    return out * amp([[SPRING_PAN_DB / 2], [-SPRING_PAN_DB / 2]])


def catches():
    """Catches of the cutter on the wood, as rows for knocks()."""
    return [(*row, row[-1] + CATCH_TICK_DB, CATCH_THUMP_DB, CATCH_CONTACT_S, CATCH_PAN_DB,
             CATCH_WIDTH, CATCH_BLOW_DB) for row in CATCH_ROWS]


def singing(hz):
    """Extra drive over time of the panel at this pitch."""
    t = np.arange(0, N + 64, 64) / SR
    boost_db = np.zeros(len(t))
    for centre_s, length_s, panel_hz, db in PANEL_SINGS:
        if abs(panel_hz / hz - 1) < 0.035:
            boost_db += db * np.exp(-(2 * (t - centre_s) / length_s) ** 2)
    return amp(np.interp(np.arange(N) / SR, t, boost_db))


def patchy(x, patchy_db, rate_hz, start_s):
    """Bands of a sound swell and sink independently."""
    out, n = np.zeros_like(x), np.arange(round(start_s * SR), N)
    for k, band_hz in enumerate(zip(HISS_EDGES_HZ, HISS_EDGES_HZ[1:])):
        part = signal.sosfilt(signal.butter(2, band_hz, "band", fs=SR, output="sos"), x[:, n])
        out[:, n] += (-1) ** k * drift(rate_hz, n, lambda v: amp(patchy_db * v)) * part
    return out


def cutter():
    """Each flute bites in turn at a wavering pace; chips shake housing and desk and hiss."""
    housing, desk = sum(amp([db, db + desk_db]) for db, desk_db in map(in_time, EFFORT_SPELLS))
    treble = sum(amp(in_time(spell)[0]) for spell in HISS_SPELLS)
    bite = np.cos(2 * np.pi * np.cumsum(FLUTES_PER_S * amp(7.0 * drift(9.4))) / SR)
    load = amp(0.6 * bite + 1.4 * drift(40))
    splinters = amp(SPLINTERS_DB) * grains(SPLINTERS_PER_S, spread_db=3.5)
    chips = rms_one(load * (grains(CHIPS_PER_S, spread_db=1.0) + splinters))
    gusts = load * amp(1.0 * drift(16))
    specks = [grains(1.1 * CHIPS_PER_S, spread_db=0.5) for part in ("common", "own")]
    dust = rms_one(gusts * apart(*specks))

    def drive(db, follows):
        """Chips at a level that follows effort; light effort sounds hollow."""
        return amp(db + PIVOT_DB) * (housing / amp(PIVOT_DB)) ** follows * chips

    low = drive(LOW_PANELS_DB, LOW_FOLLOWS)
    middle = drive(MID_PANELS_DB, 1)
    high = drive(HIGH_PANELS_DB, HIGH_FOLLOWS)
    shake = panels(lambda hz: singing(hz) * (low if hz < 1050 else high if hz > 2000 else middle),
                   HOUSING_MODES, wander_db=2.8, rate_hz=10.0, span_s=(4, 8))
    shake += through(amp(BED_DB) * housing * chips, body(HOUSING_BED_SPECTRUM))
    shake = signal.sosfilt(signal.butter(2, 4500, fs=SR, output="sos"), shake)
    rumble = through(desk * chips, body(DESK_BED_SPECTRUM, DESK_MODES))
    hiss = patchy(through(treble * dust, body(HISS_SPECTRUM)), patchy_db=2.6, rate_hz=11.0, start_s=4)
    return shake + rumble + hiss


def scene():
    """Two groups of sources, each with its own lead, in the room, over room tone."""
    handled = desk_thumps() + rubs() + squeak() + pencil_and_skin() + knocks(handling())
    crank = spring() + knocks(catches()) + cutter()
    direct = placed(handled, HANDS_LEAD_S) + placed(crank, CRANK_LEAD_S)
    left, right = direct + room(direct)
    lean = [(hz, db / 2) for hz, db in LEFT_MINUS_RIGHT]
    return np.stack([tilt(left, lean), tilt(right, [(hz, -db) for hz, db in lean])]) + room_tone()


def record(dry):
    """The highest peaks are rounded, the top is cut."""
    return signal.sosfilt(signal.cheby2(24, 70, CUTOFF_HZ, fs=SR, output="sos"), np.tanh(dry))


dry = scene()
out = record(dry)
unload_wav(out)
```